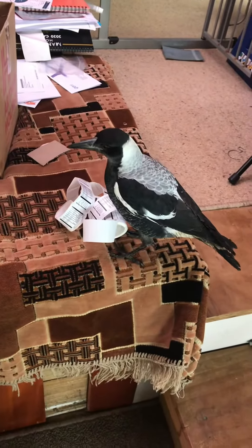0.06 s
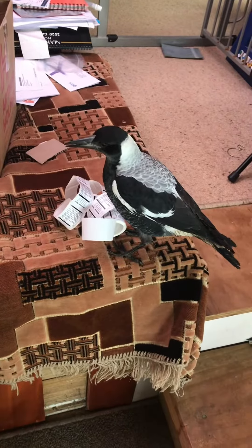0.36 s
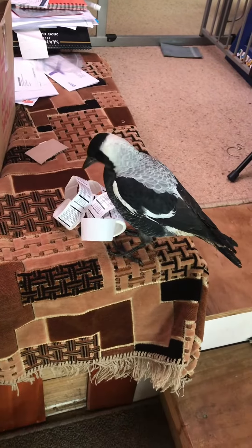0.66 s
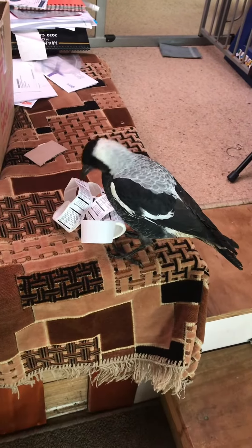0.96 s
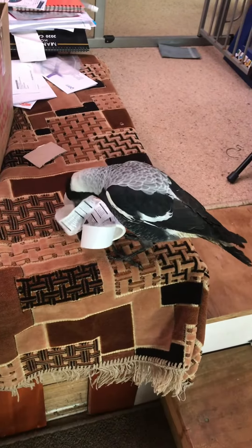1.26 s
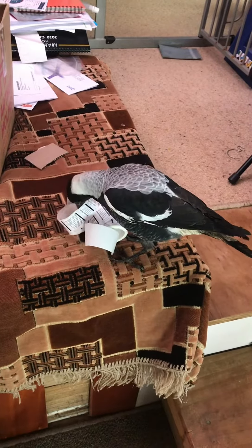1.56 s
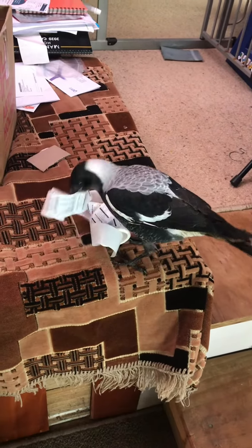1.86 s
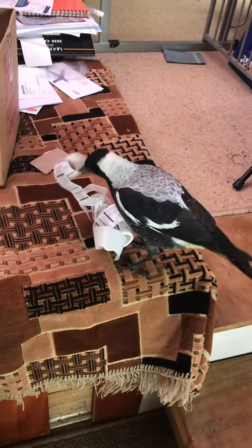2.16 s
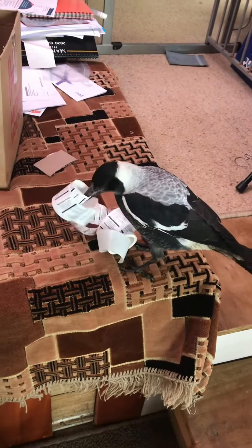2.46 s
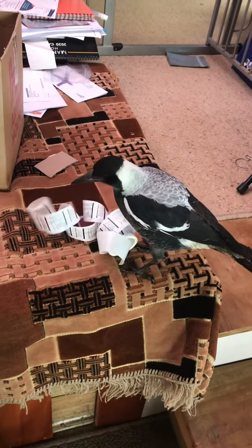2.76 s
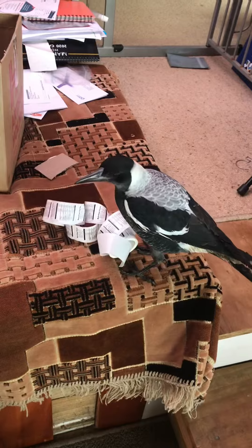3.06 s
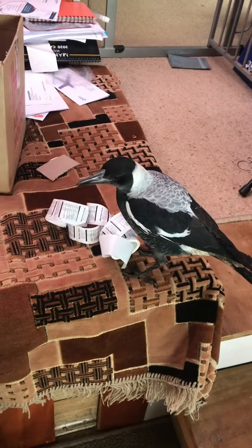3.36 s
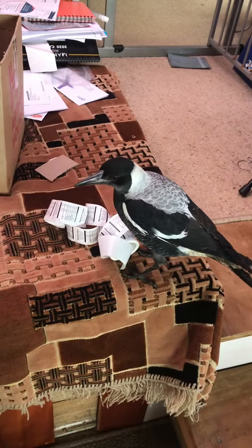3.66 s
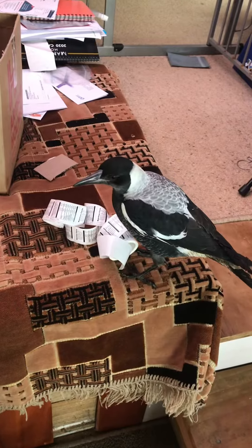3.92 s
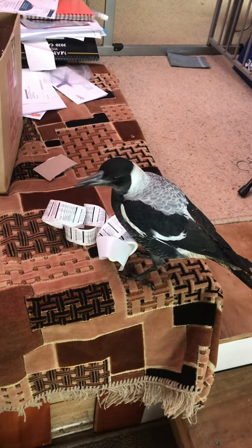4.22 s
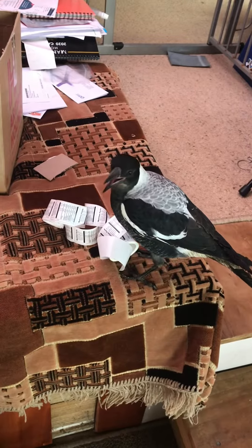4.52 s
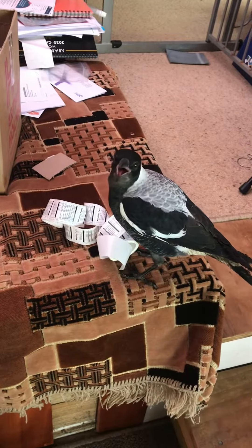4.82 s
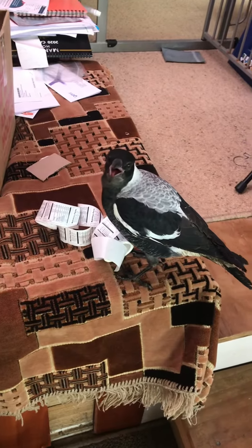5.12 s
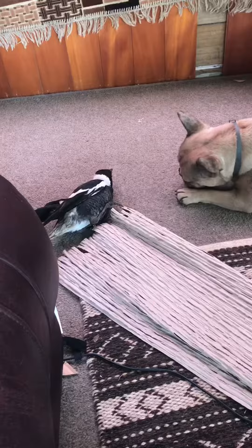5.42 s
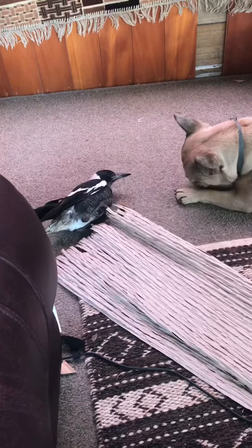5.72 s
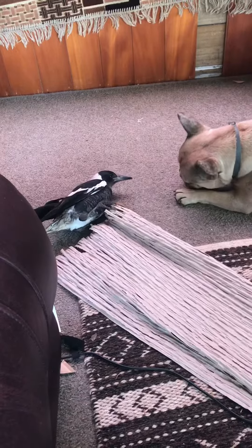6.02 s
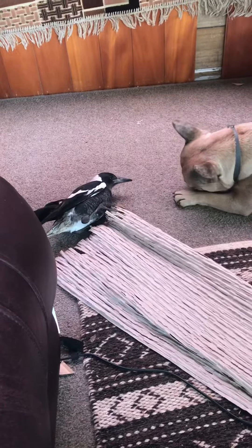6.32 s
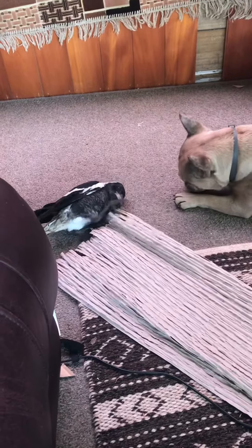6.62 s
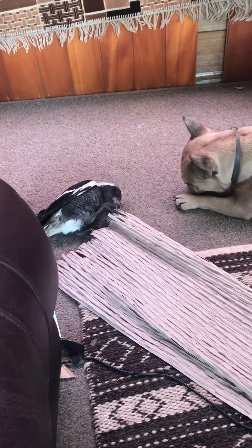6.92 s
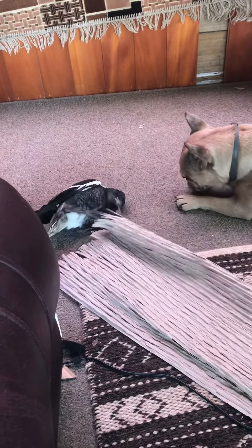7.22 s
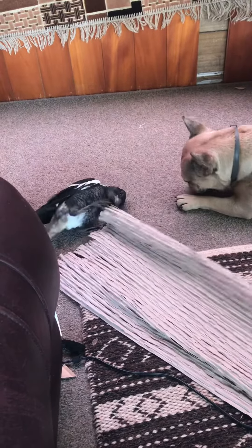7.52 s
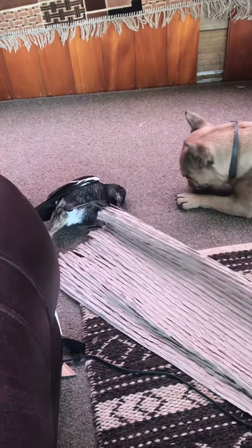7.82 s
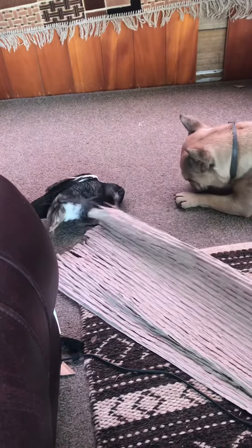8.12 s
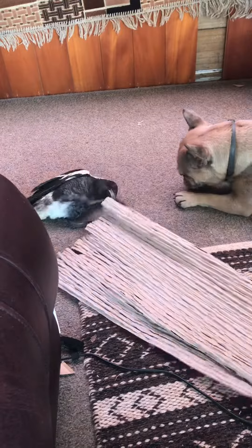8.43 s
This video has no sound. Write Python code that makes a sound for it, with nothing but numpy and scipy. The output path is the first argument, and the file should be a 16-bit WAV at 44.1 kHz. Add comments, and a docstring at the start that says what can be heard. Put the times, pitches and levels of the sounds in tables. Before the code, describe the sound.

In a small, quiet room a nearby magpie gives one short, slightly hoarse arching call. It murmurs soft notes while shaking a curl of paper, which rustles faintly and snaps once with a sharp click. Another call follows, then two brighter begging calls. Further off it chirps twice and tugs at cords on a carpet, with faint rustles, ticks and dull bumps over a low hum of air.

```python
"""A small, quiet, furnished room. On a cloth-covered table a tame magpie calls in arching notes,
murmurs while it shakes a curl of paper, then begs twice with its beak wide open. Further off, on the
carpet, it gives two chirps and tugs at a spread of cords, which rustle and bump. The voice is a stack
of harmonics from the syrinx, coloured by the beak; the rustles are tiny creases and fibres slipping.
The microphone also picks up the short echo of the room and a faint rumble of air."""
import sys
import numpy as np
from scipy import signal
from scipy.fft import rfft, irfft, next_fast_len
from scipy.io import wavfile

SR = 44100
rng = np.random.default_rng(int(sys.argv[2]) if len(sys.argv) > 2 else 0)


def materialize(psi):
    """Save the field psi as 16-bit PCM at rate SR to the path in sys.argv[1].

    A 1-D psi becomes a single channel; in a 2-D psi each row is a channel.
    """
    bounded = np.clip(np.atleast_2d(psi).T, -1, 1)
    quanta = np.round(bounded * 32767).astype(np.int16)
    wavfile.write(sys.argv[1], SR, quanta)


N = 378378
CUTOFF_HZ = 15850


# Full calls from the table. Each row: start, end and swell time in seconds; early pitch, late pitch and
# mid-call bulge in Hz; level, early overtones, late overtones and last push in dB; period doubling and
# cycle jitter in radians.
CALLS = [(0.048, 0.41, 0.15, 788.4, 880, 77.5, -40.5, -21, -13.5, -3, 0, 0.0067),
         (3.234, 3.555, 0.17, 821, 912, 4.5, -39.5, -17, -17.5, 0.5, 0, 0.0067),
         (4.099, 4.703, 0.23, 748, 917.4, 0, -39.5, -8, -6, 3.5, .1, 0.018),
         (4.927, 5.27, .035, 784, 835.5, 36.5, -42, -6, -7, -1, 0.085, .035)]
# Where the voice cracks. Each row: start and end in seconds, roughness from 0 to 1.
HOARSE_SPANS = [(.146, .18, .7), (.271, .319, .9), (.342, .358, .4), (3.266, 3.3, .85), (3.358, 3.406, .75),
                (3.42, 3.49, .25)]
# The open beak colours the overtones. Each row: frequency in Hz, gain in dB.
OPEN_BEAK = [(1300, 0), (1700, -11), (2100, -8), (2600, -3.5), (3400, -6.5), (4350, -2), (5100, -15.5),
             (6300, -9), (7100, -11.5), (7700, -26), (8700, -7), (10500, -21), (15500, -12.5)]

def calls(scoop_s=.014, sag_s=.025, release_s=0.048, break_s=0.0027, swell_db=12, release_db=18):
    """Open-beaked calls arch in pitch; hoarseness moves power from the fundamental to the overtones."""
    out = np.zeros(N)
    for (start, end, swell_s, early_hz, late_hz, bulge_hz,
         db, early_db, late_db, push_db, doubling, jitter) in CALLS:
        t = np.arange(start, end, 1 / SR)
        along = (t - start) / (end - start)
        arch = early_hz + (late_hz - early_hz) * along + bulge_hz * (1 - (2 * along - 1) ** 2)
        scoop, sag = np.exp((start - t) / scoop_s), np.exp((t - end) / sag_s)
        rough = sum(depth * np.clip(np.minimum(t - a, b - t) / break_s, 0, 1)
                    for a, b, depth in HOARSE_SPANS)
        crack = rough * (.03 + .055 * slow_noise(113, len(t)))   # the pitch jumps up and warbles
        pitch = arch * (1 - .25 * scoop - .3 * sag + crack)
        onset_db = swell_db * np.minimum((t - start) / swell_s - 1, 0) + first_puff_db(t - start)
        fade_db = release_db * np.minimum((end - t) / release_s - 1, 0)
        # a last push changes the brightness just before the call falls away
        surge_db = push_db * np.exp(-((end - 0.097 - t) / 0.028) ** 2)
        loud_db = db + onset_db + fade_db + 0.3 * surge_db - 2 * rough
        bright_db = early_db + (late_db - early_db) * along - 9.5 * (scoop + sag) + surge_db + rough
        add(out, start, syrinx(t, pitch, loud_db, bright_db, OPEN_BEAK, jitter,
                               hiss_db=-8, second_db=3, rough=rough, doubling=doubling))
    return out


# Soft notes, mostly at the table. Each row: start, peak and end in seconds, peak pitch in Hz, glide on
# either side in octaves per second, relative level and overtones in dB.
MURMURS = [(1.004, 1.115, 1.2, 892, 4.35, -49.5, -0.5), (1.229, 1.264, 1.325, 911, 4.6, -50, 0.5),
           (1.322, 1.335, 1.425, 733, 2.2, -58, -26), (1.713, 1.763, 1.795, 687, 8.4, -48, -3),
           (1.799, 1.813, 1.868, 656, 6.2, -49, -13), (1.876, 1.925, 1.975, 721, 6.3, -50, -2.5),
           (2.291, 2.378, 2.435, 690, 5.5, -45.5, -4), (2.654, 2.799, 2.87, 1006, 5.3, -43, -2.5),
           (6.48, 6.506, 6.545, 758, 23.4, -50, 0)]
# The closed beak muffles the overtones. Each row: frequency in Hz, gain in dB.
CLOSED_BEAK = [(1100, -7), (1400, -8), (1700, -22), (2200, -26), (2900, -26), (3900, -25.5), (4800, -28),
               (9000, -65)]

def murmurs(turn_s=.02, db_per_octave=16):
    """Closed-beaked notes glide up, turn over and glide down, softer the lower they are."""
    out = np.zeros(N)
    for start, peak, end, peak_hz, glide, db, overtones_db in MURMURS:
        t = np.arange(start, end, 1 / SR)
        octaves_down = glide * (np.hypot(t - peak, turn_s) - turn_s)
        loud_db = db - db_per_octave * octaves_down + first_puff_db(t - start)
        add(out, start, syrinx(t, peak_hz * 2 ** -octaves_down, loud_db, overtones_db, CLOSED_BEAK,
                               jitter=0.048, hiss_db=-22, second_db=-1.5))
    return out


# Two chirps from the carpet, further off. Each row: start, end and attack in seconds, first pitch in Hz,
# glide in octaves per second, level and overtones in dB, roughness from 0 to 1.
CHIRP_GLIDES = [(5.537, 5.575, 0.016, 939, 4, -43.5, -19.5, 0.08),
                (5.563, 5.592, 0.0022, 798, -3.5, -45.5, -10, 0.37),
                (5.782, 5.812, 0.0099, 1157, 9.5, -52.5, -10.5, 0.1),
                (5.807, 5.835, 0.013, 900, 8, -37.5, -16, 0.14),
                (5.831, 5.842, 0.0023, 828, -4, -44, -10, 0.6)]

def chirps(rise_db=17):
    """Each chirp is a few quick glides, with the voice breaking downwards between them."""
    out = np.zeros(N)
    for start, end, attack_s, hz, glide, db, overtones_db, rough in CHIRP_GLIDES:
        t = np.arange(start, end, 1 / SR)
        pitch = hz * 2 ** (glide * (t - start))
        loud_db = db + rise_db * np.minimum((t - start) / attack_s - 1, 0)
        add(out, start, syrinx(t, pitch, loud_db, overtones_db, OPEN_BEAK,
                               jitter=0.12, hiss_db=-30, second_db=-5, rough=rough))
    return out


# Smooth hiss and hoarse rasp in the voice. Each row: frequency in Hz, relative density in dB.
HISS_COLOUR = [(1500, -16), (4300, 7), (5200, 1), (9000, 5), (15000, -4)]
RASP_COLOUR = [(400, -45), (900, -15.5), (4400, 1.5), (5200, -15), (9000, -14), (15000, -31)]

def syrinx(t, pitch, db, overtones_db, beak, jitter, hiss_db, second_db, rough=0, doubling=0):
    """One note from the vibrating membranes: a harmonic stack whose overtones grow with effort."""
    waver = (0.0051 + 0.0273 * rough) * slow_noise(88.6, len(t))
    phase = 2 * np.pi * np.cumsum(pitch * (1 + waver)) / SR
    # cycles alternately long and short put lines halfway between the harmonics
    phase += doubling * np.sin(phase / 2)
    # uneven cycles smear the high harmonics most
    phase += (jitter + .07 * rough) * slow_noise(600, len(t))
    voice = np.sin(phase)
    for k in range(2, int(CUTOFF_HZ / pitch.mean()) + 2):
        # the higher an overtone, the more it depends on effort
        effort_db = overtones_db * (1 + 0.78 * np.log(k / 4)) + second_db * (k == 2)
        flutter_db = 3 * slow_noise(19.6, len(t))
        gain = from_db(at_hz(beak, k * pitch) + effort_db + flutter_db) * (1 - rough / 4)
        voice += gain * np.sin(k * phase + rng.uniform(0, 2 * np.pi)) * (k * pitch < SR / 2)
    # air hisses through on each opening of the membranes, and rasps when they flap irregularly
    puffs = (1 + np.sin(phase)) * (1 + .5 * np.sin(phase / 2)) * rng.standard_normal(len(t))
    hiss = from_db(1.4 * overtones_db + hiss_db) * coloured(puffs, HISS_COLOUR)
    rasp = from_db(overtones_db + 1) * rough * coloured(puffs, RASP_COLOUR)
    shimmer = 1 + .4 * rough * slow_noise(120, len(t))
    fades = np.clip(np.minimum(t - t[0], t[-1] - t) / 0.0037, 0, 1)
    return np.sqrt(2) * from_db(db) * fades * shimmer * (voice + hiss + rasp)


def first_puff_db(age_s, lift_db=4, decay_s=0.0066):
    """The first puff of a note is a little stronger."""
    return lift_db * np.exp(-age_s / decay_s)


# Sharp snaps of paper and beak. Each row: time in seconds, relative level in dB, decay in seconds,
# top edge in Hz.
SNAPS = [(1.131, -45, 0.0033, 15000), (1.139, -46, 0.0012, 4000), (1.276, -49, 0.0028, 10700),
         (1.336, -50, 0.0014, 14000), (1.573, -46.5, 0.0024, 14000), (1.586, -47.5, 0.0025, 12300),
         (1.6125, -41.5, 0.00098, 2650), (1.821, -44.5, 0.0093, 17200), (2.1763, -37.5, 0.00063, 12100),
         (2.22, -21, 0.00079, 19000), (2.225, -36, 0.00096, 15000), (2.228, -27.5, 0.0021, 18000),
         (2.233, -28.5, 0.0024, 9000), (2.2491, -29.5, 0.00088, 10900), (2.504, -49, 0.0017, 15000),
         (2.526, -53, 0.0018, 15000), (2.555, -45.5, .002, 9000), (2.632, -47.5, 0.0034, 14000),
         (2.702, -53, 0.0059, 12100), (5.418, -57, 0.0011, 14000), (5.691, -55, 0.01, 5830),
         (6.901, -50, 0.0043, 15000), (6.998, -50.5, 0.0014, 3180), (7.481, -43, 0.0011, 14000),
         (7.542, -41, 0.00054, 12000), (7.77, -52.5, 0.0018, 2400), (7.908, -51, 0.0018, 8860),
         (8.167, -46, 0.0049, 15100), (8.319, -53, .005, 12000), (8.358, -43, .0025, 7040)]

def snaps():
    """Paper buckles and the beak clicks: brief bursts of noise with a papery ring."""
    cracks = np.zeros(N)
    t = np.arange(SR // 10) / SR
    for start, db, decay_s, top_hz in SNAPS:
        envelope = np.exp(-t / decay_s) * (1 - np.exp(-t / (0.62 * decay_s)))
        noise = rms_one(low_pass(rng.standard_normal(len(t)), top_hz))
        add(cracks, start, from_db(db) * noise * envelope / envelope.max())
    return 0.63 * cracks + 0.36 * resonance(cracks, 2420, 1250) + 0.15 * resonance(cracks, 6500, 1600)


# The paper moves on the table. Each row: start and end in seconds, relative level in dB.
PAPER_SHAKES = [(1.11, 1.17, -66), (1.25, 1.36, -73.5), (1.565, 1.64, -65), (1.71, 1.87, -65.5),
                (1.96, 2.07, -67), (2.16, 2.21, -55.5), (2.225, 2.275, -52.5), (2.28, 2.38, -59),
                (2.497, 2.64, -62.5), (2.67, 2.8, -77), (2.94, 3.04, -75.5)]
# Its rustle. Each row: frequency in Hz, relative density in dB.
PAPER_COLOUR = [(150, -14), (600, 2), (1300, -5.5), (2400, 2.5), (4000, -1.5), (5000, -0.5), (7000, -0.5),
                (10000, -1), (16000, -1)]

def paper_rustle():
    """Creases slip as the bird nudges and shakes the curl of paper."""
    return rustle(PAPER_SHAKES, PAPER_COLOUR, slips_per_s=1100, spread_db=2, smooth_db=-2,
                  attack_s=.025, release_s=.085)


# The cords stir on the carpet, further off. Each row: start and end in seconds, relative level in dB.
CORD_PICKS = [(5.9, 6.47, -73), (6.5, 6.64, -62.5), (6.79, 6.83, -66), (6.9, 7.1, -66.5),
              (7.125, 7.24, -58.5), (7.33, 7.42, -62.5), (7.48, 7.66, -62.5), (7.85, 7.98, -64),
              (8.07, 8.26, -61.5), (8.3, 8.41, -58), (8.52, 8.58, -64.5)]
# Their rustle. Each row: frequency in Hz, relative density in dB.
CORD_COLOUR = [(200, 4), (1200, 3), (2000, 2), (3200, 5.5), (5000, 2.5), (8000, 4.5), (11000, 3),
               (16000, 6.5)]

def cord_rustle():
    """Fibres slip as the beak picks through the cords."""
    return rustle(CORD_PICKS, CORD_COLOUR, slips_per_s=2500, spread_db=4, smooth_db=-3.5,
                  attack_s=0.0067, release_s=0.13)


def rustle(moves, spectrum, slips_per_s, spread_db, smooth_db, attack_s, release_s):
    """Tiny random slips come in clumps over a smooth hiss, swelling with each movement."""
    sizes = from_db(spread_db * np.minimum(rng.exponential(1, N), 4)) * rng.choice([-1, 1], N)
    slips = rms_one(sizes * (rng.random(N) < slips_per_s / SR))
    grains = slips + from_db(smooth_db) * rng.standard_normal(N)
    clumps = from_db(3.34 * slow_noise(71))
    motion = np.max([stroke(start, end, db, attack_s, release_s) for start, end, db in moves], axis=0)
    return motion * coloured(grains * clumps, spectrum)


def stroke(start, end, db, attack_s, release_s, arch_db=5):
    """Gain of one movement: it builds, is strongest in its middle and lets go."""
    out, t = np.zeros(N), np.arange(start, end + release_s, 1 / SR)
    off_middle = np.minimum((2 * (t - start) / (end - start) - 1) ** 2, 1)
    fades = np.clip(np.minimum((t - start) / attack_s, 1 - (t - end) / release_s), 0, 1)
    add(out, start, from_db(db + arch_db * (.5 - off_middle)) * fades)
    return out


# Dull bumps, mostly down on the carpet. Each row: time in seconds, relative level in dB, top edge in Hz.
BUMPS = [(2.229, -43.5, 400), (5.389, -49, 580), (5.406, -43.5, 655), (7.128, -49, 1100),
         (7.143, -45.5, 980), (7.159, -45, 900), (7.186, -51.5, 1150), (7.248, -51, 1500),
         (7.368, -50, 685), (7.77, -52, 1700), (8.066, -46.5, 636), (8.433, -43.5, 1870)]
# What a bump sets ringing. Each row: frequency and width in Hz, gain in dB.
BUMP_MODES = [(127, 130, -3), (324, 54, 4.5), (580, 120, 9), (690, 34, -1.5), (900, 320, -7),
              (1470, 130, 7), (2750, 170, 17)]

def bumps(settle_s=0.011, rub_db=-22):
    """Soft blows ring the low modes; harder ones reach the higher modes."""
    out = np.zeros(N)
    t = np.arange(SR // 10) / SR
    for start, db, top_hz in BUMPS:
        # one firm push, then a little rubbing as the contact settles
        contact = (t == 0) + from_db(rub_db) * np.exp(-t / settle_s) * rng.standard_normal(len(t))
        push = low_pass(contact, top_hz, order=6)
        body = sum(from_db(mode_db) * resonance(push, hz, width) for hz, width, mode_db in BUMP_MODES)
        strength = np.sqrt(np.sum(body ** 2) / (0.013 * SR))   # rms as if packed into 13 ms
        add(out, start, from_db(db - 11.5) * body / strength)
    return out


# Tugs drag the cords along the floor. Each row: start and end in seconds, relative level in dB,
# top edge at the start in Hz.
TUGS = [(6.25, 7.103, -70.5, 750), (7.116, 7.425, -59, 3040), (7.583, 7.665, -62.5, 900),
        (7.735, 7.958, -61, 1760), (8.086, 8.59, -69.5, 790)]
# The scrape of the carpet. Each row: frequency in Hz, relative density in dB.
SCUFF_COLOUR = [(40, -1.5), (90, 6.5), (200, -5), (420, -3), (700, -3), (1100, -11), (3500, -1.5)]

def carpet_scuff(slips_per_s=220, smooth_db=-7, slow_drag_hz=564):
    """The cords stick and slip over the carpet; each tug scrapes brightly, then dulls as it slows."""
    slips = rms_one((rng.random(N) < slips_per_s / SR) * rng.standard_normal(N))
    scrape = coloured(slips + from_db(smooth_db) * rng.standard_normal(N), SCUFF_COLOUR)
    times, top_hz = np.transpose([point for start, end, _, hz in TUGS
                                  for point in ((start, hz), (end, slow_drag_hz))])
    log_top = np.interp(np.arange(N) / SR, times, np.log(top_hz))
    # the top edge moves by crossfading four low-passes
    edges_hz = np.geomspace(400, 4000, num=4)
    position = np.interp(log_top, np.log(edges_hz), np.arange(len(edges_hz)))
    blend = sum(np.maximum(1 - abs(position - k), 0) * rms_one(low_pass(scrape, hz, order=3))
                for k, hz in enumerate(edges_hz))
    motion = sum(stroke(start, end, db, attack_s=0.004, release_s=0.068) for start, end, db, _ in TUGS)
    return blend * motion


def room_echo(x, gap_s=0.00089, split_hz=3000, low_t60_s=0.25, treble_t60_s=0.13):
    """Dense reflections reach the microphone after a short gap; the treble dies first."""
    t = np.arange(SR // 2) / SR
    white = rng.standard_normal(len(t))
    low = low_pass(white, split_hz, order=1)
    tail = low * from_db(-60 * t / low_t60_s) + (white - low) * from_db(-60 * t / treble_t60_s)
    tail *= t > gap_s
    return signal.fftconvolve(x, tail / np.sqrt(np.sum(tail ** 2)))[:N]


# Room tone all round the microphone. Each row: frequency in Hz, relative density in dB.
AIR_COLOUR = [(25, -51), (38, -10.5), (52, -1), (70, -7.5), (130, -10.5), (350, -15), (500, -20),
              (630, -16), (1300, -25), (2600, -28), (4000, -29), (10000, -35), (14000, -31.5), (15800, -31)]

def room_tone(db=-66.5):
    """Still air: a faint, steady rumble with a trace of hiss."""
    return from_db(db) * coloured(rng.standard_normal(N), AIR_COLOUR)


def from_db(db):
    return 10 ** (np.asarray(db) / 20)


def rms_one(x):
    return x / np.sqrt(np.mean(x ** 2) + 1e-20)


def low_pass(x, hz, order=2):
    return signal.sosfilt(signal.butter(order, min(hz, SR / 2 - 1), fs=SR, output="sos"), x)


def slow_noise(hz, size=N):
    """Random wavering up to the given rate; rms 1."""
    return rms_one(low_pass(rng.standard_normal(size), hz))


def at_hz(spectrum, hz):
    """A spectrum's dB at any frequency."""
    points_hz, db = np.transpose(spectrum)
    return np.interp(np.log(hz + 1), np.log(points_hz), db)


def coloured(x, spectrum):
    """Shape a noise by a spectrum; rms 1."""
    size = next_fast_len(len(x))
    hz = np.arange(size // 2 + 1) * SR / size
    return rms_one(irfft(rfft(x, size) * from_db(at_hz(spectrum, hz)), size)[:len(x)])


def resonance(x, hz, width_hz):
    """Two-pole resonance with gain 1 at its peak."""
    r = np.exp(-np.pi * width_hz / SR)
    gain = (1 - r * r) / 2
    return signal.lfilter([gain, 0, -gain], [1, -2 * r * np.cos(2 * np.pi * hz / SR), r * r], x + 1e-18)


def add(out, start_s, sound):
    """Mix a sound in at a time."""
    start = int(start_s * SR)
    out[start:start + len(sound)] += sound[:max(N - start, 0)]


def scene():
    """What reaches one microphone: the voice, the bird's handling noises, their echo and the air."""
    calling, murmuring, chirping = calls(), from_db(-4.5) * murmurs(), chirps()
    handling = (from_db(3.5) * paper_rustle() + from_db(-1.64) * cord_rustle()
                + from_db(-1) * carpet_scuff() + from_db(-0.5) * snaps() + from_db(5) * bumps())
    echo = room_echo(from_db(-8.5) * calling + from_db(-7) * murmuring
                     + from_db(-6.5) * chirping + from_db(-6) * handling)
    return (calling + murmuring + chirping + handling + echo + room_tone())[None]


def record(dry):
    """The microphone drops the deepest bass; the top is cut steeply."""
    thin = signal.sosfilt(signal.butter(2, 30, "high", fs=SR, output="sos"), dry)
    return signal.sosfilt(signal.ellip(10, .1, 70, CUTOFF_HZ, fs=SR, output="sos"), thin)


dry = scene()
out = record(dry)
materialize(out)
```